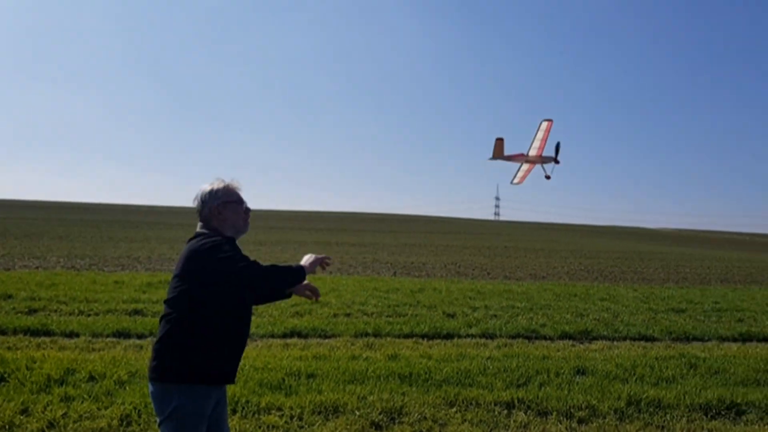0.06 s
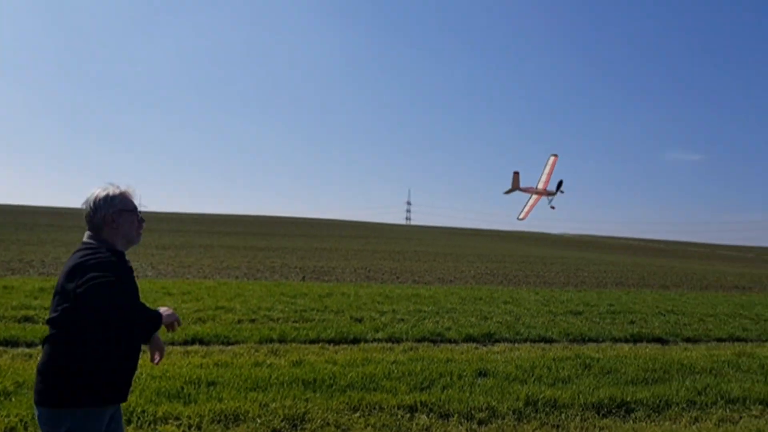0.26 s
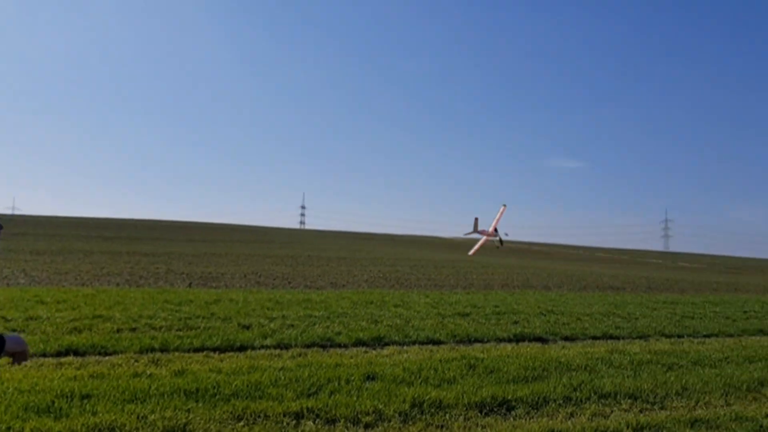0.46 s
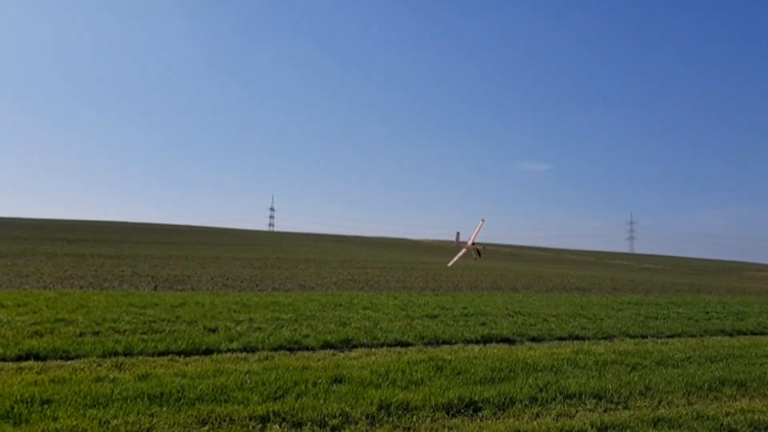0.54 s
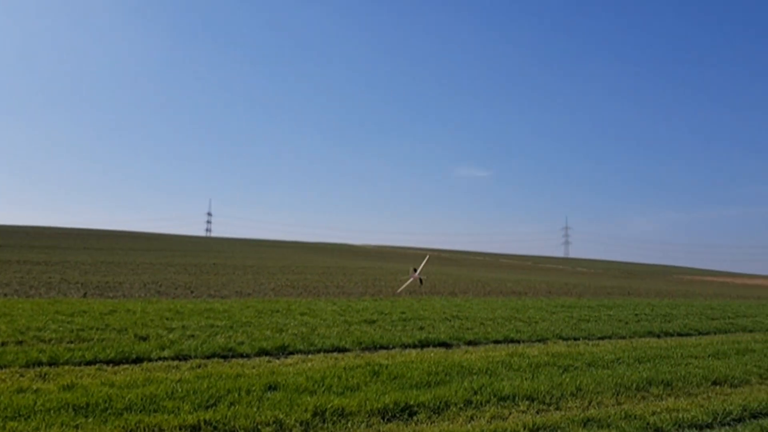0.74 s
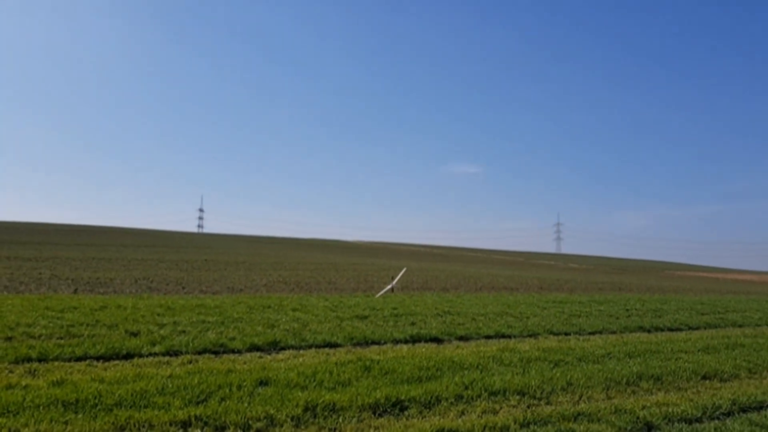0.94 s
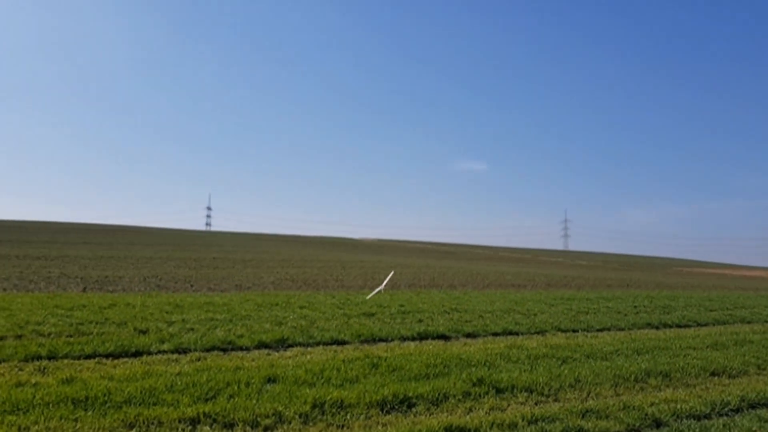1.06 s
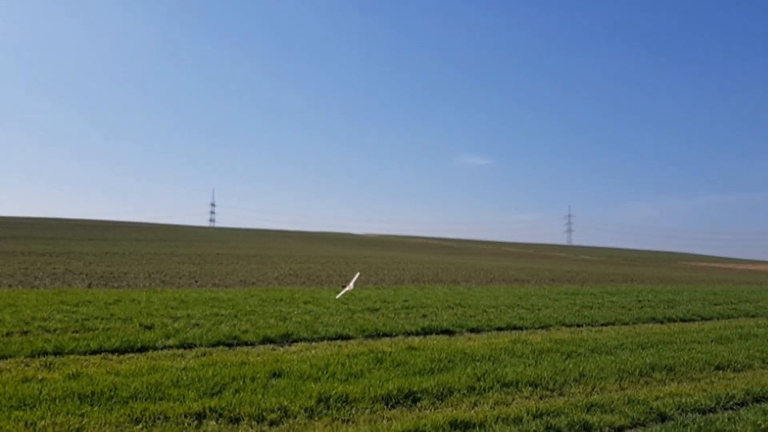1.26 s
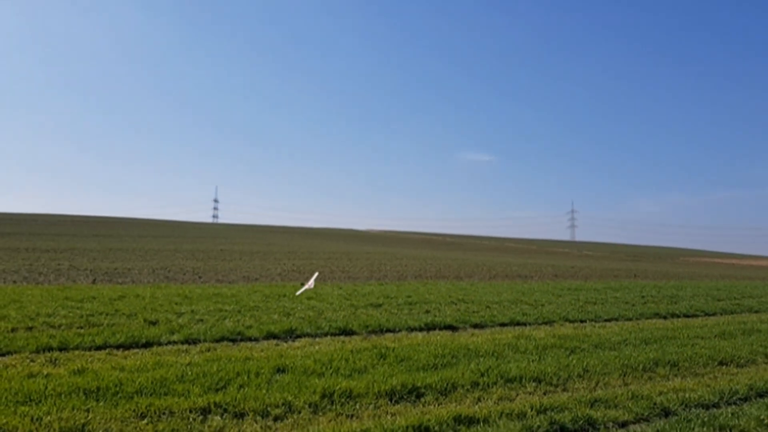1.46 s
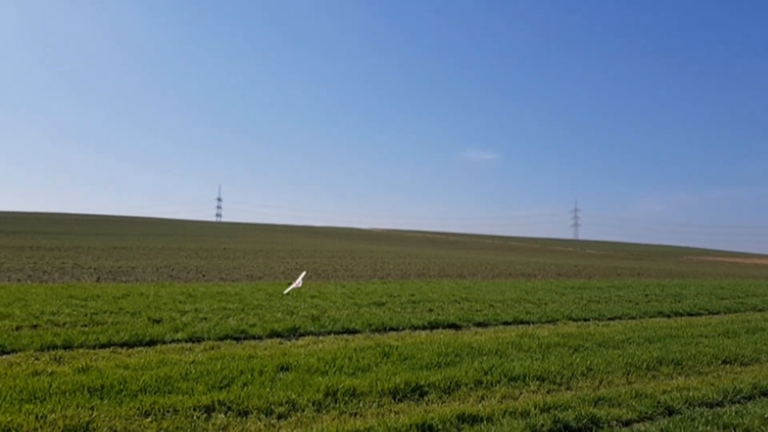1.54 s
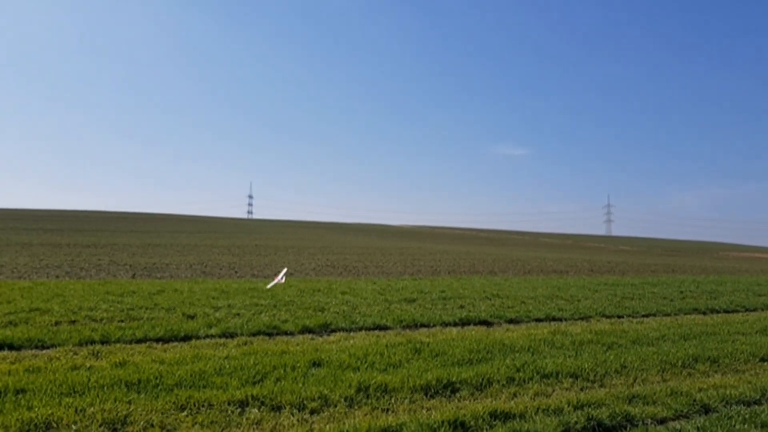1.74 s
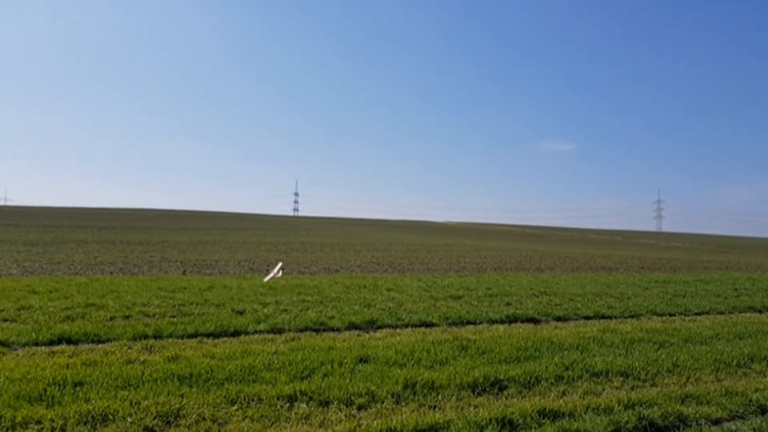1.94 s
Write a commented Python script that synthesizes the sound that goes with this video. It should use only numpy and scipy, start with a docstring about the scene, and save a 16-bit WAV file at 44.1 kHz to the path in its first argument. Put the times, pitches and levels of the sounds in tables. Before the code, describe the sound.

A rubber-powered model plane flies off over a field, its propeller ticking rapidly with small knocks and fading. Early on, a jacket swishes and grass crackles underfoot. Light wind rumbles on the microphone, mostly on the right.

```python
"""A rubber-powered model plane is hand-launched over a field, with a faint hum and a swish of the
thrower's jacket. From the start its propeller shaft ticks once a turn and the unwinding rubber knocks,
both ringing the light fuselage. Grass crackles and snaps underfoot, and a light wind buffets the
microphone, mostly on the right. The ticks fade as the plane flies away; a faint hollow rustle follows,
and at the end a soft scuff and one more swish."""
import sys
import numpy as np
from scipy import signal
from scipy.fft import rfft, irfft
from scipy.io import wavfile
from scipy.ndimage import uniform_filter1d

SR = 44100
rng = np.random.default_rng(int(sys.argv[2]) if len(sys.argv) > 2 else 0)


def pcm_store(signal):
    """Save signal as 16-bit PCM."""
    levels = np.round(np.clip(np.atleast_2d(signal), -1, 1) * 32767)
    wavfile.write(sys.argv[1], SR, levels.astype(np.int16).T)


N = 88200
T = np.arange(N) / SR


def from_db(db):
    """Amplitude ratio of a level: tenfold for every 20 dB."""
    return 10 ** (np.asarray(db) / 20)


def rms_one(x):
    """Normalisation to unit rms."""
    return x / np.sqrt(np.mean(x ** 2) + 1e-20)


def in_time(rows):
    """Linear interpolation of a control curve at every sample."""
    return np.interp(T, *np.transpose(rows))


def at_hz(points, hz):
    """Interpolation on a logarithmic frequency axis."""
    at, values = np.transpose(points)
    return np.interp(np.log(hz), np.log(at), values)


def drift(rate_hz):
    """Low-pass noise: a slow random fluctuation of unit rms."""
    hz = np.arange(N // 2 + 1) * SR / N
    return rms_one(irfft(rfft(rng.standard_normal(N)) / (1 + (hz / rate_hz) ** 2), N))


def resonance(hz, centre_hz, width_hz):
    """Lorentzian resonance curve of unit height."""
    return 1 / (1 + (2 * (hz - centre_hz) / width_hz) ** 2)


def bursts(times, db, decay_s, attack_s=.00077):
    """Incoherent summation: impacts rise quickly, decay exponentially and add in power."""
    power = np.bincount(np.clip(np.asarray(times) * SR, 0, N).astype(int), from_db(db) ** 2, N + 1)[:N]
    rise, fall = np.exp(-1 / (attack_s * SR)), np.exp(-2 / (decay_s * SR))
    power = signal.lfilter([1 - rise], [1, -rise], power + 1e-18)
    return np.sqrt(signal.lfilter([1], [1, -fall], power + 1e-18))


# Coherence of left and right: f/Hz, correlation
COHERENCE = [(100, 0.82), (700, 0.5), (1500, 0.47), (3500, 0.21), (8000, 0), (14000, 0.1)]
def noise(spectrum, left_db=0, left_db_per_octave=0, peaks=(), echo=0, echo_s=.00195):
    """Partly coherent stereo noise of unit rms, with optional peaks and ground-echo interference."""
    hz = np.maximum(np.arange(N // 2 + 1) * SR / N, 1)
    mid, side = rfft(rng.standard_normal((2, N)))
    alike = at_hz(COHERENCE, hz)
    pair = np.sqrt(1 + alike) * mid + np.sqrt(1 - alike) * side * [[1], [-1]]
    ripple_hz = np.arange(400, SR / 2, 90)   # random fine ripple gives a slightly patchy colour
    db = at_hz(spectrum, hz) + 2 * np.interp(hz, ripple_hz, rng.standard_normal(len(ripple_hz)), left=0)
    db += sum(rise * resonance(hz, centre, width) for centre, width, rise in peaks)
    octaves = np.log2(np.maximum(hz, 2000) / 4000)
    pan = from_db(np.array([[.5], [-.5]]) * (left_db + left_db_per_octave * octaves))
    ground = 1 + echo * np.exp(-2j * np.pi * hz * echo_s)
    return rms_one(irfft(pair * ground * from_db(db) * pan, N))


# Spectrum of the steady background hiss, with two dips and a bright top: f/Hz, relative level/dB
HISS_SPECTRUM = [(100, 21), (300, 7.5), (600, 0.5), (1000, 0.5), (2200, -3), (2900, -7.5), (4000, -2),
                 (6500, -2), (8500, -20), (10500, 0), (12500, 3), (16000, -2.5)]
def hiss(level_db=-66.5):
    """Stationary broadband noise forms the noise floor."""
    return from_db(level_db) * noise(HISS_SPECTRUM, left_db=2)


# Envelope of the rustle: t/s, level/dB
HOLLOW_LEVEL = [(1.1, -95), (1.33, -74), (1.46, -74.5), (1.75, -80.5)]
# Its spectrum: f/Hz, relative level/dB
HOLLOW_SPECTRUM = [(300, 2.5), (750, -17), (1000, 7), (1250, -7), (1700, -5.5), (2200, 2.5), (2800, -19),
                   (9000, -40)]
def hollow_rustle():
    """Random amplitude modulation makes a faint, hollow noise flutter."""
    return from_db(in_time(HOLLOW_LEVEL) + 3 * drift(40)) * noise(HOLLOW_SPECTRUM)


# Wind at the exposed right port: t/s, level/dB
WINDWARD_LEVEL = [(0, -54.5), (.17, -56), (.22, -38.5), (.35, -40.5), (.52, -37), (.56, -26.5),
                  (.62, -27.5), (.66, -34.5), (.74, -33.5), (.83, -31), (.9, -34), (.99, -29.5),
                  (1.06, -41), (1.45, -38), (1.8, -46), (2.0, -38)]
# Wind at the sheltered left port: t/s, level/dB
LEEWARD_LEVEL = [(0, -61.5), (.3, -49.5), (.7, -49), (.9, -49), (.96, -39.5), (1.05, -45.5), (1.3, -52.5),
                 (2.0, -54)]
# Spectrum of the rumble: f/Hz, relative level/dB
WIND_SPECTRUM = [(20, -19), (35, -4.5), (58, 8.5), (85, -5), (125, -14), (180, -24), (260, -33.5),
                 (400, -52.5), (800, -68)]
def wind(brightening=.62, edge_hz=84, flutter_db=3):
    """Turbulent pressure rumbles at each microphone port and brightens as the gust grows."""
    db = np.array([in_time(LEEWARD_LEVEL), in_time(WINDWARD_LEVEL)])
    rumble = noise(WIND_SPECTRUM)
    rumble /= np.sqrt(uniform_filter1d(rumble ** 2, size=3500, axis=1))   # even out chance swells
    upper = signal.sosfiltfilt(signal.butter(2, edge_hz, "high", fs=SR, output="sos"), rumble)
    upper_gain = from_db(brightening * (db - db.mean(axis=1, keepdims=True)))
    return from_db(db + flutter_db * drift(5)) * (rumble + (upper_gain - 1) * upper)


# Eddies at the right port: t/s, envelope peak level/dB, f/Hz, half length/cycles
EDDY_PULSES = [(0.202, -30.5, 126, 0.52), (0.238, -24, 103, 0.93), (0.303, -21, 62.5, 0.58),
               (0.467, -25, 74.3, 0.35), (0.546, -20.5, 71, 1.3), (0.568, -18.5, 117, 0.35),
               (0.591, -25, 138, 1.1), (0.616, -20, 84, 1.6), (.808, -19, 97.6, 0.76),
               (.836, -20.5, 61.5, 0.5), (0.865, -32, 154, 1.16), (.934, -8.5, 55.5, 0.27),
               (0.958, -29.5, 160, 0.48), (1.164, -18, 55, 0.86), (1.387, -37, 125, 0.48),
               (1.453, -41.5, 130, .76)]
def eddies(steepening_rad=.71):
    """A passing eddy swings the pressure up and down; the stronger it is, the steeper its front."""
    out = np.zeros((2, N))
    for s, db, hz, half_length in EDDY_PULSES:
        cycles = hz * (T - s)
        phase = 2 * np.pi * cycles + steepening_rad * from_db(db) * np.tanh(16 * cycles)
        out[1] += from_db(db) * np.sin(phase) / np.cosh(np.clip(cycles / half_length, -10, 10)) ** 2
    return out


# Crackle of a step on the grass: t/s, level/dB
STEP_LEVEL = [(.1, -75.5), (.25, -56), (.32, -59.5), (.38, -59), (.42, -53.5), (.5, -59), (.57, -56.5),
              (.6, -68), (.9, -71.5), (1.82, -97), (1.93, -84), (2.0, -73)]
# Snapping stalks: t/s, level/dB, f/Hz
STALK_SNAPS = [(0.254, -50, 2100), (.397, -50, 1330), (0.411, -45, 2810), (0.445, -52.5, 2727),
               (0.477, -48, 2900), (.367, -54, 2600), (0.508, -55.5, 1970), (0.566, -51.5, 2670)]
# Spectrum of the stalks: f/Hz, relative level/dB
GRASS_SPECTRUM = [(370, -9.5), (520, -0.5), (800, -18), (1300, -6.5), (2600, -6.5), (4000, -9),
                  (6000, -16.5), (9000, -23), (16000, -20.5)]
def grass(stalks_per_s=690, spread_db=3.5, snap_width_hz=1900, snap_rise_db=18.5, echo=-.29):
    """Stalks crackle underfoot as a Poisson process; a few snap, each with its own resonance."""
    stalk_db = spread_db * np.minimum(rng.exponential(1, N), 3)
    struck = rng.random(N) < stalks_per_s / SR
    crackle = rms_one(bursts(T[struck], stalk_db[struck], decay_s=.0026)) * from_db(in_time(STEP_LEVEL))
    out = crackle * noise(GRASS_SPECTRUM, left_db=1, echo=echo)
    for s, db, hz in STALK_SNAPS:
        ring = noise(GRASS_SPECTRUM, left_db=1, peaks=[(hz, snap_width_hz, snap_rise_db)], echo=echo)
        out += bursts([s], [db], decay_s=.0073) * ring
    return out


def scuff(peak_s=1.98, half_length_s=.098, level_db=-68):
    """Friction noise with a broad mid resonance swells into a short, soft rub."""
    swell = np.exp(-((T - peak_s) / half_length_s) ** 2)
    rub = noise(GRASS_SPECTRUM, left_db=1, peaks=[(2160, 1100, 18)])
    return swell * from_db(level_db + 2 * drift(66)) * rub


# Sweeps of the sleeve over the jacket: t/s, level/dB
SLEEVE_LEVEL = [(0, -60), (.08, -55.5), (.17, -49.5), (.25, -49.5), (.275, -63), (.38, -65.5), (.48, -56.5),
                (.6, -66.5), (.95, -71.5), (1.82, -80.5), (1.89, -65), (1.96, -60), (2.0, -66.5)]
# Spectrum of the cloth: f/Hz, relative level/dB
CLOTH_SPECTRUM = [(500, -19.5), (1400, -21.5), (2300, -13), (4500, -13), (7200, -4.5), (9000, -11),
                  (11000, -7), (13200, 1), (14500, -5), (16000, -27)]
def jacket():
    """Sliding friction of smooth cloth on itself gives a thin, slightly uneven hiss."""
    envelope = from_db(in_time(SLEEVE_LEVEL) + 1.75 * drift(36))
    return envelope * noise(CLOTH_SPECTRUM, left_db=2, left_db_per_octave=2.5, echo=-.18)


def hum(hz=211.7, level_db=-65.5, end_s=.464, fade_s=.018):
    """Random frequency modulation makes a low tone waver; it fades as the plane leaves."""
    phase = 2 * np.pi * np.cumsum(hz * (1 + .04 * drift(22))) / SR
    fade = .5 * (1 - np.tanh((T - end_s) / fade_s))
    return from_db(level_db) * np.sqrt(2) * np.sin(phase) * fade


# Shaft ticks as the plane recedes: t/s, level/dB
TICK_LEVEL = [(0, -57), (.45, -57), (.65, -56.5), (1.3, -61), (1.6, -65), (2.0, -73)]
# Knocks of the unwinding rubber: t/s, level/dB
RUBBER_KNOCKS = [(.007, -48.5), (0.049, -47.5), (0.103, -48), (.639, -47), (0.749, -52), (0.858, -52.5),
                 (1.017, -52.5), (1.078, -55), (1.099, -60), (1.131, -56.5), (1.183, -56), (1.232, -54.5),
                 (1.283, -53), (1.454, -56), (1.611, -55.5)]
# Ring of the airframe: f/Hz, relative level/dB
AIRFRAME_SPECTRUM = [(500, -9), (1100, -22.5), (2300, -8), (2900, -14), (3400, -1.5), (5000, -6.5),
                     (6800, -11.5), (8000, -18), (16000, -12)]
# Fuselage resonances: f/Hz, width/Hz, level above the airframe's ring/dB
FUSELAGE_MODES = [(3630, 91, 2.5), (3905, 79, 6.5), (6160, 860, 5.5)]
def plane(turns_per_s=37.8, slowing_per_s2=.4, first_turn_s=.003, spread_db=2.5, tail_db=-11):
    """Impact excitation: one shaft tick a turn and the rubber's knocks briefly ring the airframe."""
    turns = turns_per_s * (T - first_turn_s) - .5 * slowing_per_s2 * T ** 2
    ticks = np.flatnonzero(np.diff(np.floor(turns)) > 0)
    tick_db = in_time(TICK_LEVEL)[ticks] + spread_db * np.clip(rng.standard_normal(len(ticks)), -2, 1)
    s, db = np.vstack([np.column_stack([T[ticks], tick_db]), RUBBER_KNOCKS]).T
    envelope = np.hypot(bursts(s, db, decay_s=.0027), bursts(s, db + tail_db, decay_s=.032))
    return envelope * noise(AIRFRAME_SPECTRUM, left_db=2.5, peaks=FUSELAGE_MODES)


def scene():
    """Superposition: the sounds of background, thrower and plane add linearly."""
    background = hiss() + hollow_rustle() + wind() + eddies()
    thrower = grass() + scuff() + jacket()
    return background + thrower + hum() + plane()


def record(dry, low_cut_hz=66.3, high_cut_hz=15900):
    """Band limiting: the deepest bass rolls off gently and the top is cut steeply."""
    thinned = signal.sosfilt(signal.butter(1, low_cut_hz, "high", fs=SR, output="sos"), dry)
    return signal.sosfilt(signal.ellip(12, .1, 80, high_cut_hz, fs=SR, output="sos"), thinned)


dry = scene()
out = record(dry)
pcm_store(out)
```